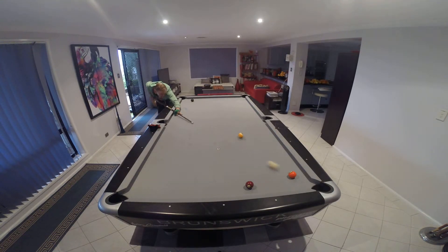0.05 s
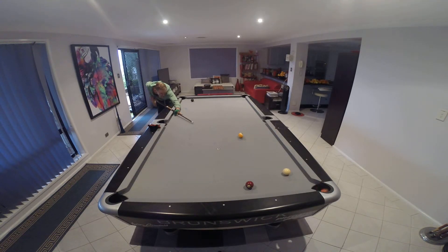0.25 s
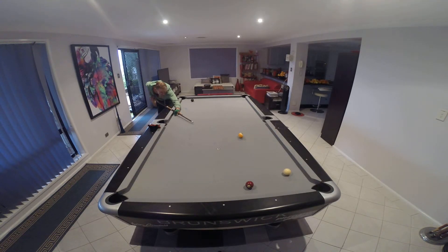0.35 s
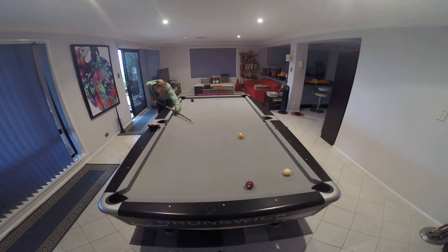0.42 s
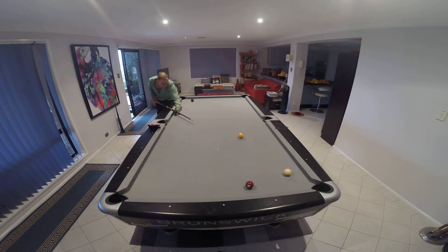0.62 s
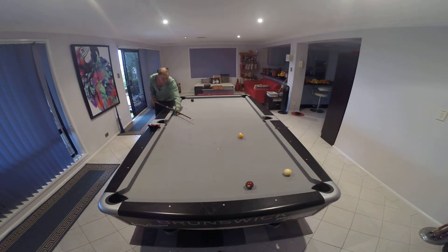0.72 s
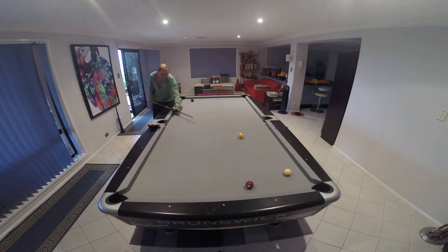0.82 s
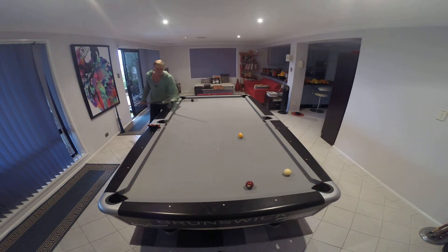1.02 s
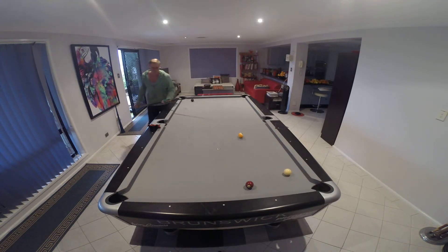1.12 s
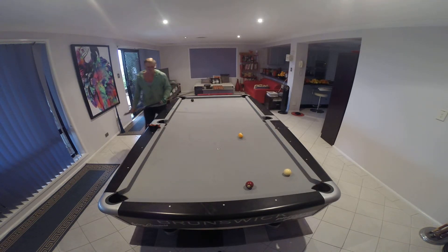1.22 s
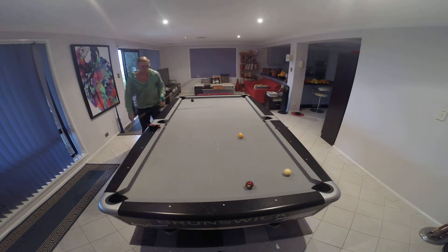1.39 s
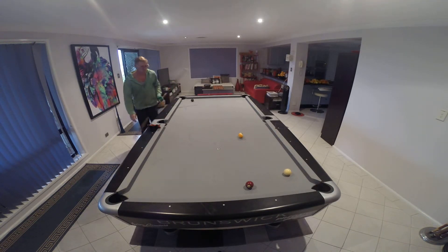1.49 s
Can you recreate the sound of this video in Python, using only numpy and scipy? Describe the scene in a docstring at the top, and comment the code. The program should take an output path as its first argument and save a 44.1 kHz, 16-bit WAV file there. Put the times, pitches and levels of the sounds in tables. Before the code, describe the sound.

Pool balls click, and one drops loudly into a pocket, knocking and rumbling through the table.

```python
"""The fading ring of a cue stroke in a tiled games room, then the sharp click of cue ball on ball.
The struck ball slams into the corner pocket, drops, and knocks and rolls along the return channel,
making the table's hollow body hum. The player stands up with a faint rustle.
Hard walls, floor and ceiling throw every hit back."""
import sys
import numpy as np
from scipy import signal
from scipy.io import wavfile

SR = 44100
rng = np.random.default_rng(int(sys.argv[2]) if len(sys.argv) > 2 else 0)


def unload_wav(signal):
    """Save mono or channel-first audio to the path in sys.argv[1] as 16-bit WAV at rate SR, clipped to [-1, 1]."""
    wavfile.write(
        sys.argv[1],
        SR,
        np.round(np.clip(np.atleast_2d(signal).T, -1, 1) * 32767).astype(np.int16),
    )


N = 68355


def amp(db):
    """Decibels to gain."""
    return 10 ** (np.asarray(db) / 20)


def unit_rms(x):
    """Scales a signal to rms 1."""
    return x / np.sqrt(np.mean(x ** 2) + 1e-20)


def curve_at(points, hz):
    """Reads a curve on a log-frequency axis."""
    freq_hz, value = np.transpose(points)
    return np.interp(np.log(hz + 1), np.log(freq_hz + 1), value)


def fader(points):
    """Gain over time from (time_s, level_db) points."""
    return amp(np.interp(np.arange(N) / SR, *np.transpose(points)))


def add(mix, start_s, sound):
    """Mixes a sound in at a time."""
    part = mix[max(round(start_s * SR), 0):][:len(sound)]
    part += sound[:len(part)]


def through(x, response):
    """Convolves and cuts to the scene's length."""
    return signal.fftconvolve(x, response)[:N]


def eq(x, tone, size=4096):
    """Colours a sound with a minimum-phase filter of unit energy."""
    hz = abs(np.fft.fftfreq(size, 1 / SR))
    log_gain = np.log(amp(curve_at(tone, hz)))
    spectrum = np.exp(np.conj(signal.hilbert(log_gain)))
    response = np.fft.ifft(spectrum).real[:size // 2]
    return through(x, response / np.linalg.norm(response))


def blows(rows, t60_s=0):
    """One impulse per (start_s, level_db) row; with a decay time, a noise burst instead."""
    out, t = np.zeros(N), np.arange(SR // 10) / SR
    for start_s, level_db in rows:
        push = rng.standard_normal(len(t)) * amp(-60 * t / t60_s) if t60_s else np.ones(1)
        add(out, start_s, amp(level_db) * push / np.linalg.norm(push))
    return out


# Decay of the tiled room: freq_hz, t60_s
ROOM_DECAY = [(100, 0.83), (400, 0.67), (1000, 0.78), (2200, 0.88), (4000, 0.84), (8000, 0.64),
              (15000, 0.38)]
def room_tail(build_s=.012, predelay_s=.002, size=256):
    """Reflections off hard surfaces build into a tail, each band dying at its own speed."""
    hz, t, spectrum = signal.stft(rng.standard_normal(N), SR, nperseg=size)
    t60_s = curve_at(ROOM_DECAY, hz)[:, None]
    decaying = spectrum * amp(-60 * t / t60_s) / np.sqrt(t60_s)
    tail = signal.istft(decaying, SR, nperseg=size)[1][:N]
    tail *= np.sqrt(np.clip((np.arange(N) / SR - predelay_s) / build_s, 0, 1))
    return tail / np.linalg.norm(tail)


def in_room(x, send_db):
    """The direct sound plus its reverb."""
    return x + amp(send_db) * through(x, room_tail())


# Colour of the cue stroke's tail: freq_hz, gain_db
CUE_TONE = [(60, 1), (200, 4), (550, -11), (800, -4), (1400, -1), (2800, -8.5), (4000, -18.5), (15000, -60)]
def cue_ring(level_db=-11):
    """The room is still ringing from the cue stroke."""
    return amp(level_db) * eq(room_tail(), CUE_TONE)


# Bass-heavy background: freq_hz, gain_db
AMBIENCE_TONE = [(20, -11), (40, -4), (58, 0.5), (90, 2.5), (150, -14.5), (300, -9.5), (600, -16),
                 (1200, -17.5), (2500, -24), (5000, -30), (10000, -42.5), (15000, -52), (16500, -77)]
def room_tone(level_db=-52):
    """A steady, quiet bed of noise."""
    return amp(level_db) * unit_rms(eq(rng.standard_normal(N), AMBIENCE_TONE))


# Early reflections of the click: delay_s, gain
CLICK_ECHOES = [(.0041, 1.25), (.0069, .4), (.0079, .6), (.0093, -1.15), (.0114, .5), (.0131, 1.55),
                (.0228, .55), (.0250, -.5)]
# Bright snap of the contact and its first echo: start_s, level_db
SNAPS = [(.2172, -21), (.2210, -27)]
# Body of the click and top end of the snap: freq_hz, gain_db
CLICK_TONE = [(100, -35), (450, -22.5), (800, -13.5), (1400, -2), (2000, 0), (2650, -1), (3300, -11),
              (4300, -18.5), (5500, -44.5), (6800, -40.5), (8300, -55), (9700, -47), (11300, -55),
              (12700, -49), (16000, -52)]
SNAP_TONE = [(2000, -6), (5000, -1.5), (7000, -15), (9800, -3), (11300, -28), (13000, -10), (16000, -17)]
def ball_click(start_s=.2173, level_db=4.5, send_db=10.5):
    """Ball meets ball: one very short contact, its hard first echoes and the room's tail."""
    contact = blows([(start_s, level_db)])
    click = contact + amp(send_db) * through(contact, room_tail(build_s=.022))
    for delay_s, gain in CLICK_ECHOES:
        add(click, delay_s, gain * contact)
    return eq(click, CLICK_TONE) + eq(blows(SNAPS), SNAP_TONE)


# The ball rattling into the pocket: start_s, thud_db, crack_db
POCKET_HITS = [(.3470, 0.5, 9), (.3520, 4, 5), (.3560, 5.5, 9.5), (.3597, 5.5, 7.5), (0.3641, 4, -19),
               (0.3725, 8, -21)]
# Short boom of the liner among longer tones: pitch_hz, level_db, t60_s
POCKET_MODES = [(171.8, -36, 0.34), (398.7, -14.5, 0.15), (570, 1.5, 0.035), (580, -41, 0.46),
                (684, -21.5, 0.95), (752, -31, 0.41), (900, -21.5, .35), (1020, -38, 0.83),
                (1224, -15.5, 0.24), (1495, -21, 0.32), (1570, -39, 1), (3100, -34, 0.064),
                (6480, -49, 0.98), (10200, -41, 0.14)]
# Dull weight and hard edge of a hit: freq_hz, gain_db
THUD_TONE = [(50, -34), (110, -40.5), (160, -14.5), (260, -16.5), (400, -7), (600, 1), (850, -0.5),
             (1200, -5), (1700, -13.5), (2600, -49.5), (5000, -42.5), (15000, -81)]
CRACK_TONE = [(200, -39.5), (1000, 5), (2800, -7), (3600, -12), (5000, -13), (7000, -19), (10000, -30.5),
              (12500, -37), (14500, -48), (16000, -46)]
def pocket_slam(ring_attack_s=.0049):
    """The ball hits jaw and liner in quick succession; the pocket rings from the second hit."""
    hits, t = np.array(POCKET_HITS), np.arange(N) / SR
    thuds = blows(hits[:, [0, 1]])
    thuds = eq(in_room(thuds, send_db=5.5), THUD_TONE)
    cracks = blows(hits[:, [0, 2]], t60_s=.039)
    cracks = eq(in_room(cracks, send_db=-4), CRACK_TONE)
    ring = sum(amp(db - 60 * t / t60) * np.sin(2 * np.pi * hz * t) for hz, db, t60 in POCKET_MODES)
    add(thuds, hits[1, 0], ring * np.minimum(t / ring_attack_s, 1))
    return thuds + cracks


# Fader moves for the roll and the scuff: time_s, level_db
ROLL_FADER = [(.36, -49), (.50, -26), (.62, -37.5), (.80, -36), (.92, -39.5), (1.02, -43), (1.13, -50),
              (1.3, -52), (1.43, -59.5), (1.55, -65)]
SCUFF_FADER = [(.80, -94), (.85, -56), (.885, -48.5), (.92, -63), (1.1, -78), (1.3, -96)]
# Low rumble and thin scrape: freq_hz, gain_db
ROLL_TONE = [(40, -15.5), (120, -10.5), (175, -1.5), (280, -6), (560, -3), (800, -15), (1250, -22.5),
             (1800, -20.5), (3000, -36), (6000, -42.5), (15000, -72)]
SCUFF_TONE = [(500, -18), (1500, 2), (2500, 5), (3300, -13.5), (4300, -8.5), (6000, -26), (10000, -28),
              (14000, -43), (16000, -60)]
def rolling(jolts_per_s=640, spread_db=3.5):
    """Tiny jolts of the rolling ball blur into a rumble; once it scuffs the channel's side."""
    jolts = rng.standard_normal(N) * amp(spread_db * np.minimum(rng.exponential(1, N), 3))
    jolts *= rng.random(N) < jolts_per_s / SR
    texture = in_room(jolts, send_db=.5)
    rumble = fader(ROLL_FADER) * unit_rms(eq(texture, ROLL_TONE))
    scuff = fader(SCUFF_FADER) * unit_rms(eq(texture, SCUFF_TONE))
    return rumble + scuff


def in_cabinet(x, scatter_db=4, t60_s=.097):
    """Smears a blow with the table's own short echoes, keeping its energy."""
    t = np.arange(SR // 8) / SR
    echoes = rng.standard_normal(len(t)) * amp(-60 * t / t60_s)
    scattered = amp(scatter_db) * through(x, echoes / np.linalg.norm(echoes))
    return (x + scattered) / np.hypot(1, amp(scatter_db))


# Knocks on the way down the channel: start_s, knock_db, tick_db
KNOCKS = [(.470, -5.5, -5), (.511, -4, -8.5), (.553, 2.5, -23), (.565, -11, -20), (.652, -9.5, -37),
          (.684, -2, -16), (.701, -2.5, -40), (.767, -3.5, -19.5), (.785, -2.5, -38), (0.858, -18, -28),
          (0.899, -22, -34), (.930, -15, -50)]
# Hollow body of a knock: freq_hz, gain_db
KNOCK_TONE = [(60, -8.5), (180, -5), (350, -1.5), (600, 0), (850, -4.5), (1250, -4.5), (1700, -13.5),
              (3000, -25), (6000, -40), (15000, -71)]
def channel_knocks():
    """The ball drops into the channel and knocks over its joints, each with its own echoes."""
    knocks = sum(in_room(in_cabinet(blows([row[:2]])), send_db=-.5) for row in KNOCKS)
    ticks = blows(np.array(KNOCKS)[:, [0, 2]], t60_s=.072)
    return eq(knocks, KNOCK_TONE) + eq(in_room(ticks, send_db=-2.5), CRACK_TONE)


def drift(count=24):
    """A slow random wobble of rms 1."""
    t, rates_hz = np.arange(N) / SR, np.geomspace(1.5, 14, count)
    return unit_rms(sum(np.sin(2 * np.pi * (hz * t + rng.random())) / np.sqrt(hz) for hz in rates_hz))


# Resonances of the hollow table: pitch_hz
HUM_PITCHES = [71, 149, 315]
# One fader curve per resonance: time_s, level_db
HUM_SWELLS = [
    [(0, -61), (.41, -58), (.51, -45), (.59, -34), (.67, -34.5), (.85, -44.5), (.92, -39), (1.10, -43.5),
     (1.16, -69), (1.30, -58), (1.38, -50), (1.55, -58)],
    [(.45, -75), (.52, -31), (.62, -29.5), (.70, -48), (.76, -44.5), (1.2, -63.5)],
    [(.62, -89), (.72, -39.5), (.90, -42), (1.2, -63), (1.55, -75)],
]
def table_hum(waver_hz=.9, waver_db=1.2):
    """Low resonances of the table swell, waver and die as the ball passes."""
    hum = np.zeros(N)
    for pitch_hz, swell in zip(HUM_PITCHES, HUM_SWELLS):
        phase = 2 * np.pi * np.cumsum(pitch_hz + waver_hz * drift()) / SR
        hum += fader(swell) * amp(waver_db * drift()) * unit_rms(np.sin(phase))
    return hum


# Two soft swells of movement: time_s, level_db
RUSTLE_FADER = [(.95, -98), (1.01, -57), (1.12, -75), (1.17, -72), (1.19, -55.5), (1.25, -56), (1.33, -66),
                (1.55, -93)]
# Colour of the rustle: freq_hz, gain_db
RUSTLE_TONE = [(300, 20), (1500, -2), (5000, 1.5), (8000, -5.5), (13000, -14), (16000, -41)]
def player_rustle():
    """A faint brush of noise as the player stands up."""
    return fader(RUSTLE_FADER) * unit_rms(eq(rng.standard_normal(N), RUSTLE_TONE))


# Last soft contacts: start_s, level_db
BUMPS = [(1.044, -16.5), (1.075, -15.5), (1.176, -16.5)]
# Muffled body of a bump: freq_hz, gain_db
BUMP_TONE = [(60, -36), (220, -8), (340, -6.5), (400, 2), (470, 1), (600, -2), (850, -26.5), (3000, -47),
             (15000, -64)]
def end_bumps():
    """The ball bumps at the channel's far end, echoing through cabinet and room."""
    bumps = sum(in_room(in_cabinet(blows([row])), send_db=-1) for row in BUMPS)
    return eq(bumps, BUMP_TONE)


def scene():
    """Hits, roll and background in a mono mix."""
    hits = ball_click() + pocket_slam() + channel_knocks() + end_bumps()
    roll = rolling() + table_hum()
    background = room_tone() + player_rustle() + cue_ring()
    return (hits + roll + background)[None]


def record(dry, ceiling=.93, cutoff_hz=15700):
    """Clips the peaks, then cuts the very top of the treble."""
    clipped = np.clip(dry, -ceiling, ceiling)
    lowpass = signal.firwin(255, cutoff_hz, window=("kaiser", 9), fs=SR)
    return signal.oaconvolve(clipped, lowpass[None], "same")


dry = scene()
out = record(dry)
unload_wav(out)
```